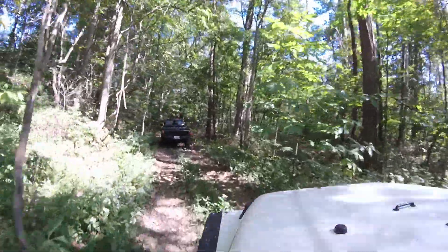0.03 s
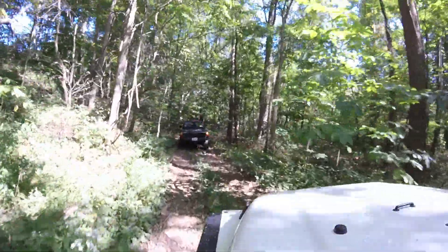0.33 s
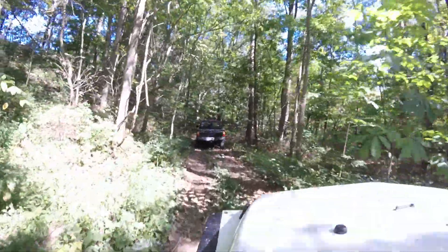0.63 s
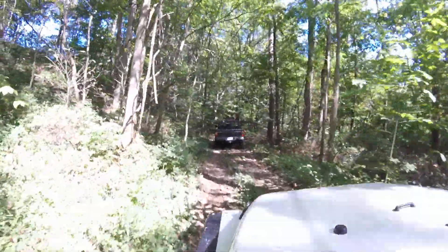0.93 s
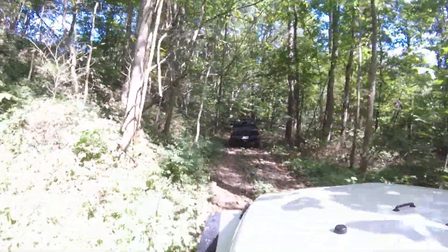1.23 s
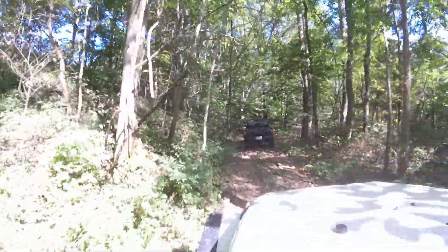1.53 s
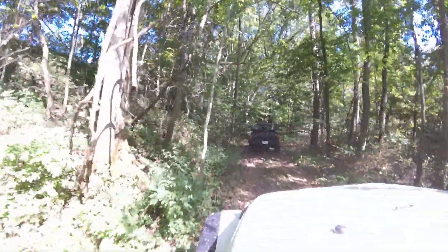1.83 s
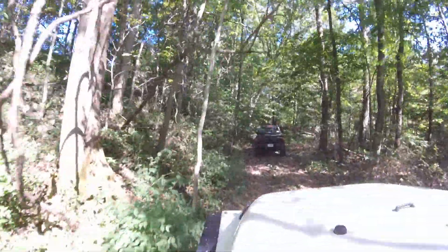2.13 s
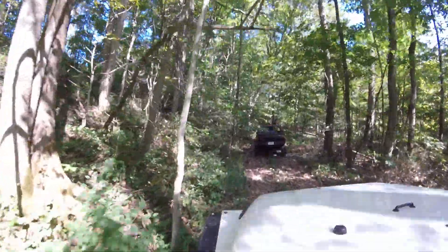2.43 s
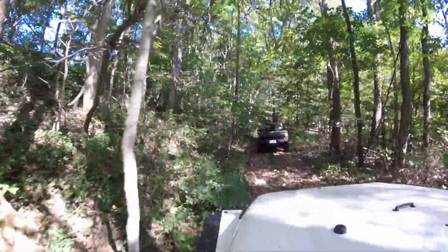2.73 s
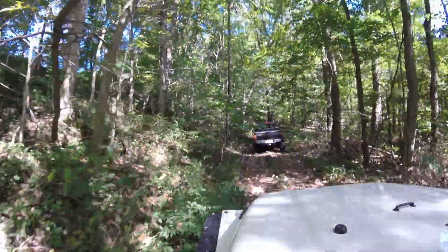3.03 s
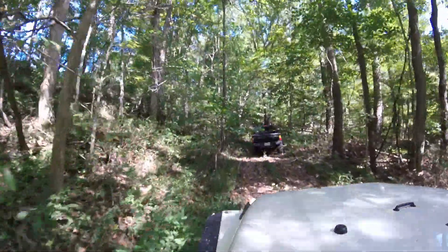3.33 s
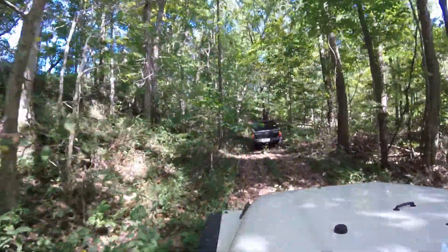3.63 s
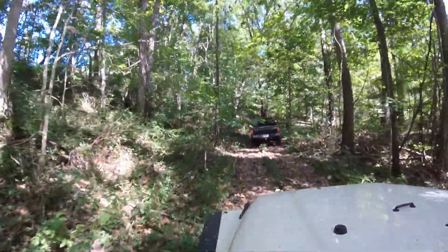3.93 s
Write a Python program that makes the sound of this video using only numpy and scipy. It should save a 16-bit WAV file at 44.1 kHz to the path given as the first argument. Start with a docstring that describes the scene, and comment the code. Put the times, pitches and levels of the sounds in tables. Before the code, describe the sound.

Heard from on board, an off-road vehicle drives through woods, its engine droning in swells over tyre noise and a lower second engine. Past halfway the engine drops amid cracking twigs and a few knocks, then picks up.

```python
"""Off-road vehicle on a woodland trail

Heard from just behind the bonnet, the engine booms under load, eases for a second and pulls again;
its partials are harmonics of one engine cycle. A second engine drones lower, beside two faint tones.
The tyres roll over dirt and leaves as shaped noise, and twigs snap under them in decaying bursts.
The body knocks and a branch clacks against it, each ringing in its own damped modes."""
import sys
import numpy as np
from scipy import signal
from scipy.fft import rfft, irfft, next_fast_len
from scipy.io import wavfile
from scipy.ndimage import uniform_filter1d, map_coordinates

SR = 44100
rng = np.random.default_rng(int(sys.argv[2]) if len(sys.argv) > 2 else 0)


def materialize(psi):
    """Save the field psi as 16-bit PCM at rate SR to the path in sys.argv[1].

    A 1-D psi becomes a single channel; in a 2-D psi each row is a channel.
    """
    bounded = np.clip(np.atleast_2d(psi).T, -1, 1)
    quanta = np.round(bounded * 32767).astype(np.int16)
    wavfile.write(sys.argv[1], SR, quanta)


N = 176400
T = np.arange(N) / SR

# Engine boom, at twice the firing rate: time_s, pitch_hz, level_db
BOOM = [(0, 189.8, -25.5), (.15, 190.7, -22), (.47, 184, -15), (.53, 188.9, -19.5), (.66, 185.7, -15),
        (1.08, 188.4, -22), (1.27, 181.4, -13), (1.58, 191.7, -21.5), (1.75, 189.4, -22.5),
        (1.83, 183, -16.5), (1.95, 181.1, -12.5), (2.27, 180.1, -13.5), (2.42, 171.8, -16),
        (2.46, 167.9, -26), (2.7, 165.3, -35.5), (3.1, 177.6, -30.5), (3.45, 184.1, -28),
        (3.54, 180.9, -23), (3.63, 178.7, -16.5), (4, 180.9, -21.5)]
# Weaker harmonics of the engine cycle: order, level_db
ENGINE_ORDERS = [(3, -44), (6, -37), (7, -43.5), (8, -38), (9, -36.5), (10, -41), (11, -35), (13, -40.5),
                 (14, -42.5), (21, -48), (24, -51)]
# Low orders that throb as the engine pulls again: time_s, fourth_db, fifth_db
THROB = [(0, -51, -54), (3.15, -48.5, -47), (3.4, -29, -44), (3.65, -32.5, -43), (3.8, -22, -28),
         (3.88, -27, -29), (4, -22, -19)]
# Second engine's firing note, wandering drone and whine: time_s, pitch_hz, level_db
SECOND_ENGINE = [(0, 72.7, -22), (.35, 75, -24), (1.05, 76.04, -25.5), (1.3, 82.8, -30.5),
                 (1.48, 82.2, -30.5), (1.72, 73.8, -30), (2.25, 69, -30), (2.5, 55.8, -57),
                 (2.8, 55.9, -29), (3, 56.12, -43), (4, 60.2, -46)]
DRONE_TONE = [(0, 159, -22.5), (.9, 146.9, -49), (1.5, 149.8, -39), (2.2, 165.4, -44.5), (3, 163.1, -39),
              (3.4, 157.5, -37), (3.7, 147.3, -43), (4, 145, -46)]
WHINE_TONE = [(0, 333, -42.5), (.5, 326, -38), (1.05, 328.7, -40), (1.3, 321, -38.5), (1.6, 332.4, -43),
              (2.2, 331.6, -43.5), (3.2, 331.1, -37.5), (4, 323.1, -54)]
# Noise envelopes: time_s, level_db
BAY_ENVELOPE = [(0, -39), (.9, -40), (1.45, -39.5), (1.65, -38), (2.4, -39), (3.1, -39.5), (3.5, -42),
                (4, -44)]
RUMBLE_ENVELOPE = [(0, -29.5), (1, -27), (2.1, -32.5), (2.5, -24.5), (3.1, -31), (3.6, -31.5), (4, -33)]
TREAD_ENVELOPE = [(0, -31), (.9, -32), (1.6, -31), (2.3, -29), (2.85, -29), (3.35, -31.5), (3.8, -33.5),
                  (4, -33.5)]
LEAF_ENVELOPE = [(0, -49.5), (1.9, -50.5), (2.3, -45.5), (2.65, -46.5), (2.8, -41.5), (3.08, -48.5),
                 (3.2, -46), (3.33, -47), (3.39, -43), (3.47, -49), (4, -49)]
# Spectral densities: frequency_hz, relative_db
BAY_SPECTRUM = [(500, 3.5), (1000, 0.5), (1600, 0.5), (2150, 2.5), (2600, -3.5), (3300, -3), (3900, -12.5),
                (5200, -11.5), (8000, -30), (15000, -35)]
RUMBLE_SPECTRUM = [(15, -5), (30, -4), (55, 1), (75, -1.5), (110, 0.5), (180, 3.5), (260, -11), (500, -59)]
TREAD_SPECTRUM = [(120, -18), (230, -0.5), (380, -1), (500, -3), (650, -4.5), (760, -9.5), (900, -11),
                  (1080, -21.5), (1600, -28), (4000, -78)]
LEAF_SPECTRUM = [(1500, -12.5), (4000, -1.5), (5200, 2), (6800, 3.5), (7600, -5.5), (8500, -0.5),
                 (9600, -10.5), (11000, -11.5), (12500, -26), (15500, -38.5)]
GRIT_SPECTRUM = [(1500, -23), (5000, 1), (8500, -0.5), (10000, -9.5), (13000, -14), (15500, -29.5)]
CRACK_SPECTRUM = [(300, -9), (1000, 0), (2100, 8.5), (2800, 1.5), (4200, 2), (5800, 2), (8800, 0),
                  (10500, -6), (12500, -12), (15500, -22)]
# Twig fractures: start_s, level_db, centre_hz, ring_relative_db
TWIG_SNAPS = [(.5305, -28, 7803, -11), (1.152, -49, 8000, 3), (1.9715, -30, 7600, -6.5),
              (2.2667, -25, 7000, -27.5), (2.355, -33.5, 5000, -14), (2.386, -30.5, 4910, -12),
              (2.4181, -22.5, 6800, -23), (2.423, -15.5, 7230, -14.5), (2.5057, -27.5, 4020, -19.5),
              (2.5745, -26, 7100, -5.5), (2.718, -30, 7900, -12), (2.756, -30, 6560, -9),
              (2.769, -15.5, 4280, -33), (2.7717, -23.5, 5000, -10), (2.799, -25.5, 5540, -15),
              (2.857, -31, 7500, -25), (2.866, -27.5, 8450, -22), (2.893, -27.5, 7500, -10),
              (3.2798, -30, 6400, -8), (3.386, -45.5, 5970, 4)]
# Impacts: start_s, level_db
BODY_KNOCKS = [(2.2657, -16), (2.422, -30), (2.835, -19), (2.8778, -7.5), (3.28, -19), (3.917, -24)]
BRANCH_CLACKS = [(3.2797, -18), (3.2865, -34), (3.293, -28)]
# Normal modes: frequency_hz, relative_db, t60_s
BODY_MODES = [(371.4, -7.5, 0.13), (427, -2.5, 0.041), (552, -2, 0.043), (644, -5.5, 0.026),
              (1260, -13, 0.016)]
BRANCH_MODES = [(1790, -12, .016), (2085, -2, 0.025), (3247, -4.5, .013), (4220, -11, .012)]


def amp(db):
    return 10 ** (np.asarray(db) / 20)


def unit_rms(x):
    return x / np.sqrt(np.mean(x ** 2) + 1e-20)


def gain_at(spectrum, hz):
    """Amplitude gain, interpolated in decibels on a log frequency axis."""
    knots_hz, db = np.transpose(spectrum)
    return amp(np.interp(np.log(hz + 1), np.log(knots_hz + 1), db))


def curves(rows):
    """One value per sample for each column after the time."""
    time_s, *columns = np.transpose(rows)
    return [np.interp(T, time_s, column) for column in columns]


def wobble(knots_per_s):
    """A smooth random curve."""
    return map_coordinates(rng.standard_normal(2048), [T * knots_per_s], mode="wrap")


def filtered(x, response):
    """Filtering multiplies the spectrum by a frequency response."""
    size = next_fast_len(len(x) + 8192)
    return irfft(rfft(x, size) * response(np.fft.rfftfreq(size, 1 / SR)), size)[:len(x)]


def coloured(x, spectrum):
    """Spectral shaping, scaled to rms 1."""
    return unit_rms(filtered(x, lambda hz: gain_at(spectrum, hz)))


def rush(spectrum, patchy_db):
    """Coloured noise of rms 1, its gain varying in patches of time and frequency."""
    cells = signal.stft(rng.standard_normal(N), nperseg=512)[2]
    patches = uniform_filter1d(rng.standard_normal(cells.shape), size=6, axis=0)
    patches = unit_rms(uniform_filter1d(patches, size=12, axis=1))
    noise = signal.istft(cells * amp(patchy_db * patches), nperseg=512)[1][:N]
    return coloured(noise, spectrum)


def phase_of(hz):
    """Phase is the time integral of frequency."""
    return 2 * np.pi * np.cumsum(hz) / SR


def partial(phase, db, flutter_db, drift_rad, knots_per_s):
    """A sinusoid of rms level db, randomly modulated in amplitude and phase."""
    peak = np.sqrt(2) * amp(db + flutter_db * wobble(knots_per_s))
    return peak * np.sin(phase + drift_rad * wobble(knots_per_s) + 2 * np.pi * rng.random())


def add(track, start_s, sound):
    part = track[max(round(start_s * SR), 0):][:len(sound)]
    part += sound[:len(part)]


def impacts(blows, modes, attack_s):
    """Modal superposition: each blow excites damped sinusoids in slightly different proportions."""
    out, t = np.zeros(N), T[:SR // 4]
    for start_s, db in blows:
        ring = sum(amp(mode_db + rng.standard_normal() - 60 * t / t60_s) * np.sin(2 * np.pi * hz * t)
                   for hz, mode_db, t60_s in modes)
        add(out, start_s, amp(db) * ring * (1 - np.exp(-t / attack_s)))
    return out


def engine():
    """One crank drives a harmonic series; the firings modulate the hiss of the engine bay."""
    boom_hz, boom_db = curves(BOOM)
    boom_phase = phase_of(boom_hz)
    cycle_phase = boom_phase / 12  # the boom is the twelfth order
    boom = partial(boom_phase, boom_db, flutter_db=1.07, drift_rad=0.05, knots_per_s=18)
    load_db = 0.14 * (boom_db - boom_db.mean())  # weaker orders share part of the boom's swell
    orders = sum(partial(order * cycle_phase, db + load_db, flutter_db=1.5, drift_rad=0.31, knots_per_s=7)
                 for order, db in ENGINE_ORDERS)
    throb = sum(partial(order * cycle_phase, db, flutter_db=4.5, drift_rad=0.11, knots_per_s=32)
                for order, db in zip((4, 5), curves(THROB)))
    hiss_db, = curves(BAY_ENVELOPE)
    firing_db = 0.77 * np.sin(boom_phase / 2)
    hiss = rush(BAY_SPECTRUM, patchy_db=1.0) * amp(hiss_db + firing_db + 0.39 * wobble(15))
    return boom + orders + throb + hiss


def second_engine():
    """Periodic firing radiates a low tone at the firing rate."""
    hz, db = curves(SECOND_ENGINE)
    return partial(phase_of(hz), db, flutter_db=0.5, drift_rad=0.08, knots_per_s=12)


def tyres():
    """Rolling contact makes broadband noise: ground rumble and the lumpy roar of tread on dirt."""
    rumble_db, = curves(RUMBLE_ENVELOPE)
    tread_db, = curves(TREAD_ENVELOPE)
    rumble = amp(rumble_db + 1.2 * wobble(9.8)) * rush(RUMBLE_SPECTRUM, patchy_db=2.7)
    tread = amp(tread_db + 0.94 * wobble(60)) * rush(TREAD_SPECTRUM, patchy_db=0.2)
    return rumble + tread


def body_knocks():
    """Cushioned bumps of the suspension excite the hollow modes of the body."""
    return impacts(BODY_KNOCKS, BODY_MODES, attack_s=0.0012)


def branch_clacks():
    """A dry branch strikes the vehicle and rebounds, vibrating freely after each contact."""
    return impacts(BRANCH_CLACKS, BRANCH_MODES, attack_s=0.0002)


def twigs(crack_t60_s=0.011, ring_t60_s=0.16):
    """Brittle fracture gives a sharp crack and a splintering ring; thick twigs sound lower."""
    out, t = np.zeros(N), T[:SR // 4]
    for start_s, db, centre_hz, ring_db in TWIG_SNAPS:
        def response(hz):
            octaves = np.log2((hz + 1) / centre_hz)
            return gain_at(CRACK_SPECTRUM, hz) * (0.73 + np.exp(-octaves ** 2))

        burst = unit_rms(filtered(rng.standard_normal(len(t)), response))
        splinter_db = 2.5 * map_coordinates(rng.standard_normal(512), [t * 350], mode="wrap")
        crack = amp(-60 * t / crack_t60_s)
        ring = unit_rms(amp(splinter_db)) * amp(ring_db - 60 * t / ring_t60_s)
        add(out, start_s, amp(db) * burst * (crack + ring))
    return out


def leaf_litter(ticks_per_s=550):
    """Crushed leaves hiss; grit adds shot noise that stands out more as the hiss grows."""
    leaf_db, = curves(LEAF_ENVELOPE)
    ticks = (rng.random(N) < ticks_per_s / SR) * rng.choice([-1, 1], N)
    tick_db = 9 * np.clip(rng.standard_normal(N), -2, 2)
    grit_db = leaf_db.mean() - 9.5 + 1.1 * (leaf_db - leaf_db.mean())
    grit = amp(grit_db) * coloured(ticks * amp(tick_db), GRIT_SPECTRUM)
    leaves = amp(leaf_db + 0.46 * wobble(18)) * rush(LEAF_SPECTRUM, patchy_db=1.84)
    return leaves + grit


def faint_tones():
    """Slow modulation makes a drone and a thin whine wander in pitch and level."""
    drone_hz, drone_db = curves(DRONE_TONE)
    whine_hz, whine_db = curves(WHINE_TONE)
    drone = partial(phase_of(drone_hz), drone_db, flutter_db=3.0, drift_rad=0.26, knots_per_s=6.6)
    whine = partial(phase_of(whine_hz), whine_db, flutter_db=3.5, drift_rad=0.8, knots_per_s=11)
    return drone + whine


def scene():
    """Sound pressures superpose at one listening point."""
    hum = engine() + second_engine() + faint_tones()
    return (hum + tyres() + leaf_litter() + twigs() + branch_clacks() + body_knocks())[None]


def record(dry):
    """An ideal low-pass filter removes the highest treble."""
    return np.array([filtered(x, lambda hz: hz < 15400) for x in dry])


dry = scene()
out = record(dry)
materialize(out)
```